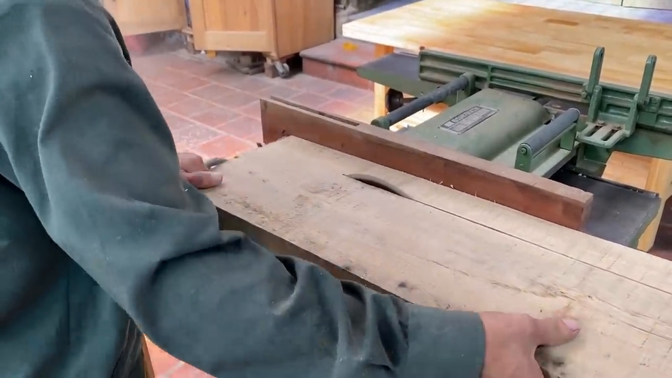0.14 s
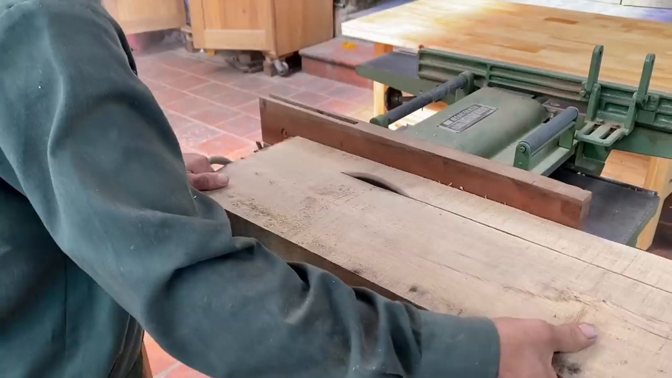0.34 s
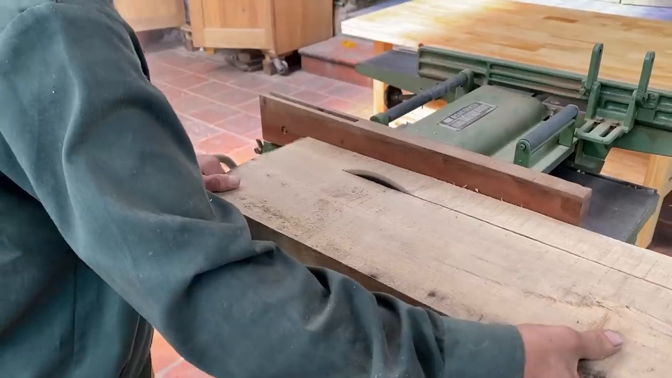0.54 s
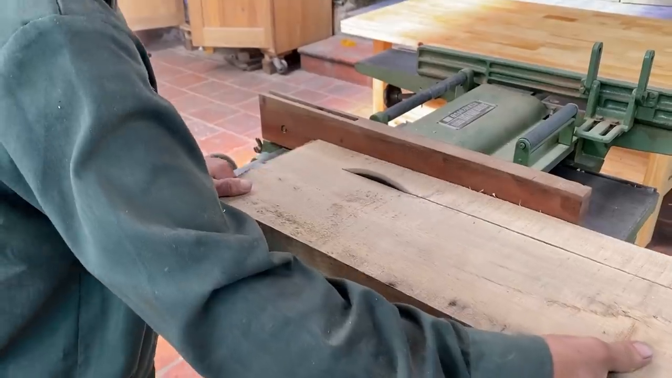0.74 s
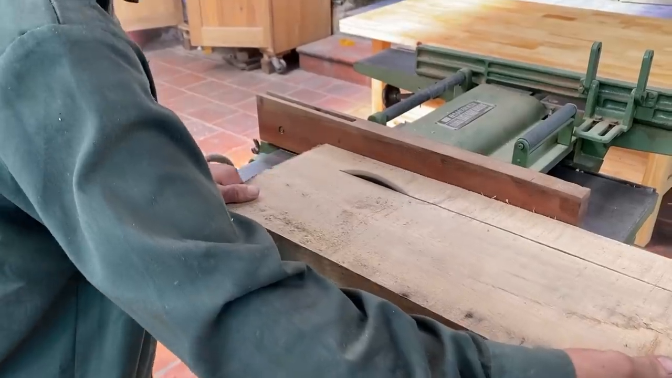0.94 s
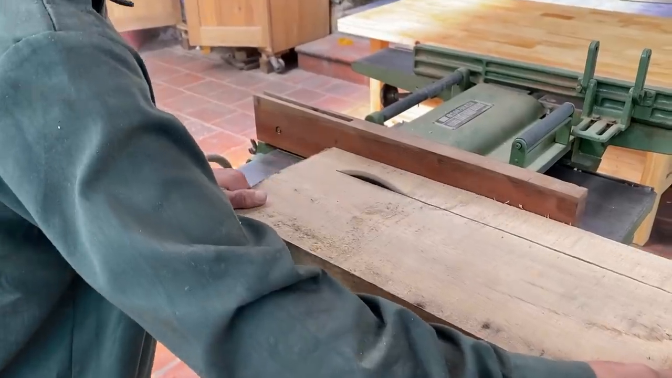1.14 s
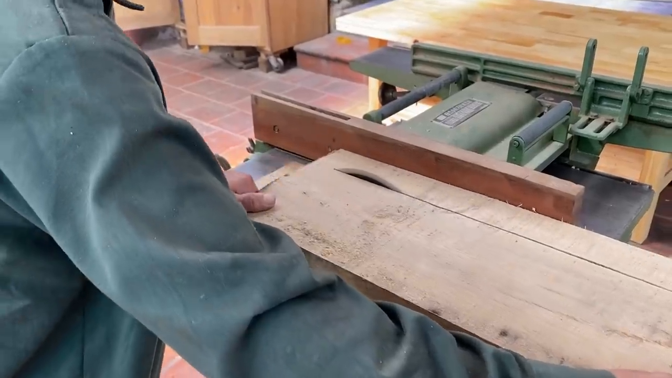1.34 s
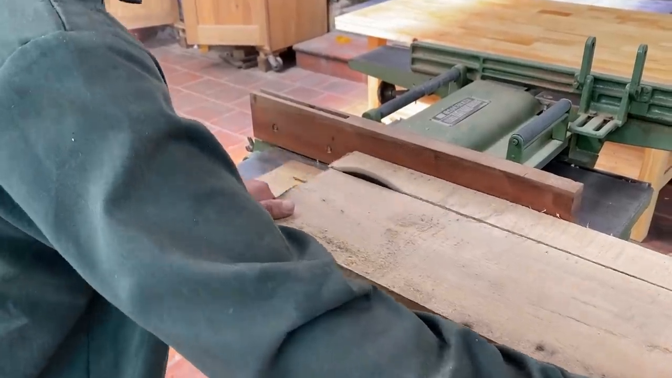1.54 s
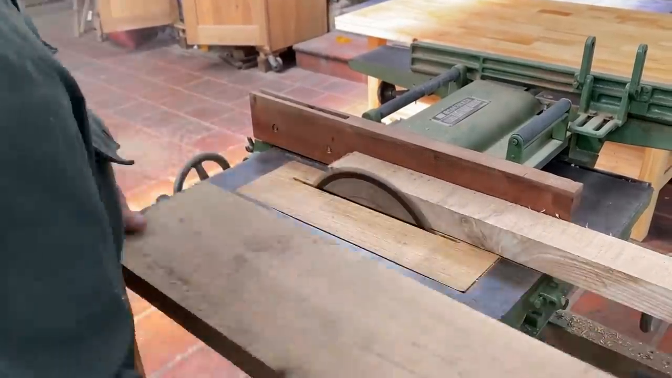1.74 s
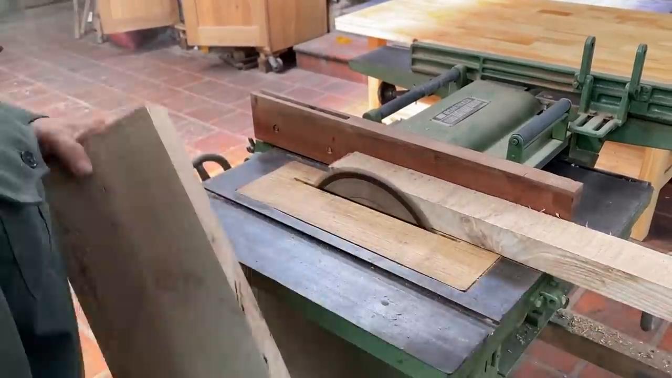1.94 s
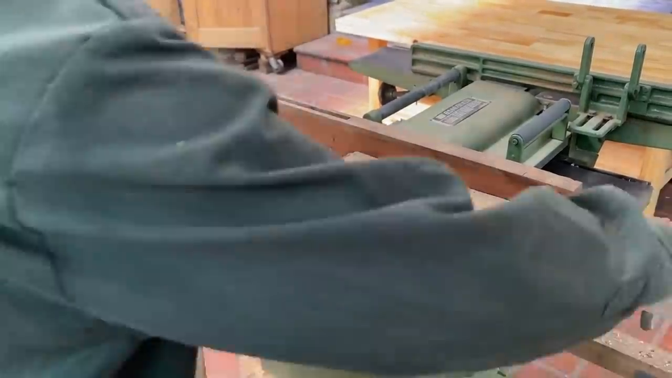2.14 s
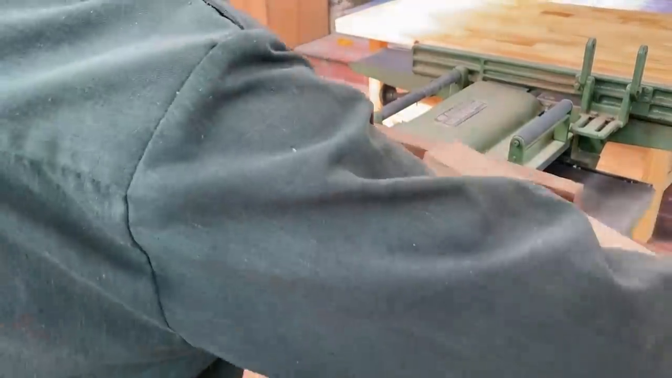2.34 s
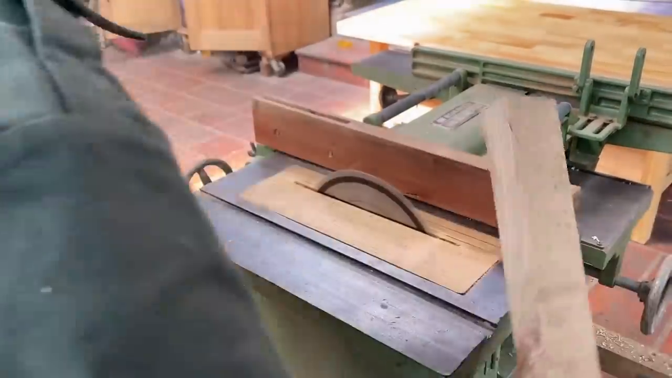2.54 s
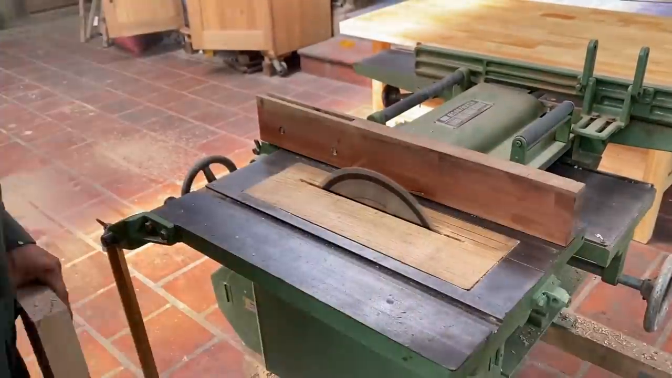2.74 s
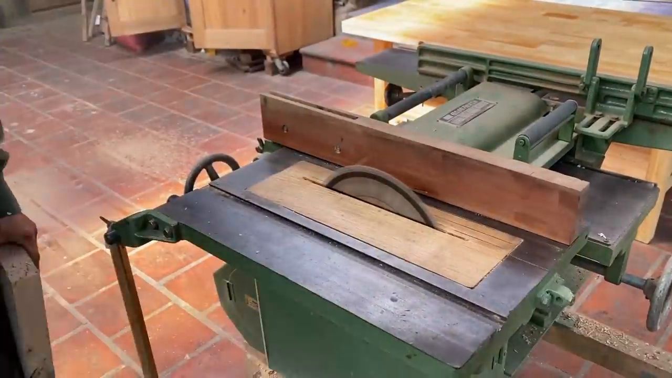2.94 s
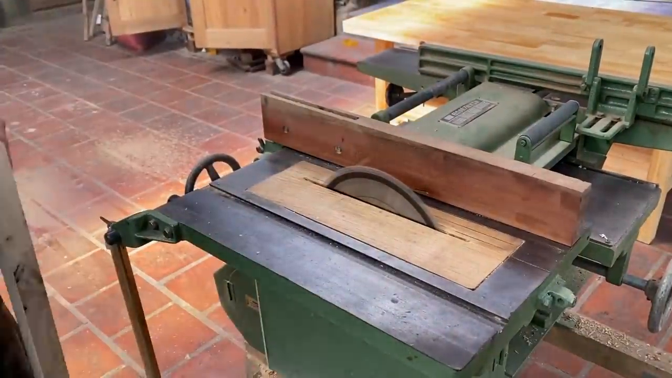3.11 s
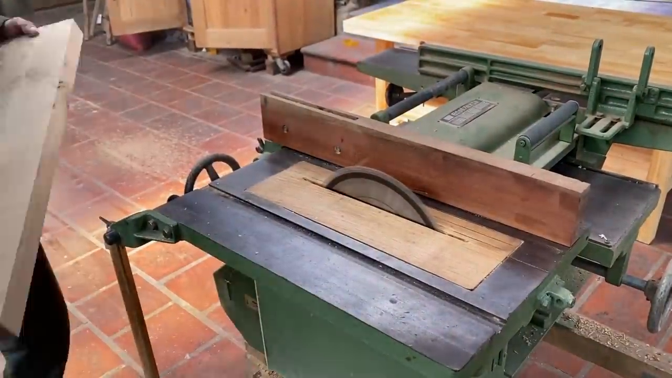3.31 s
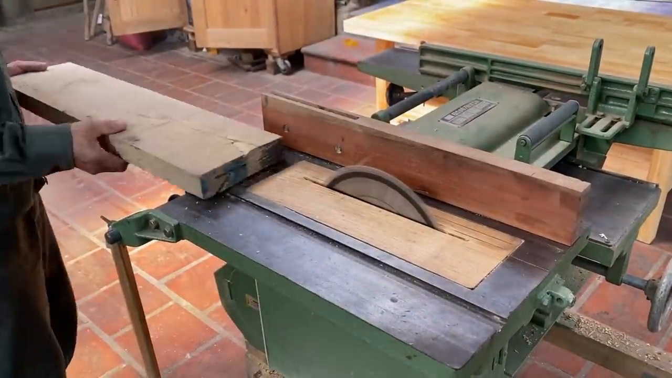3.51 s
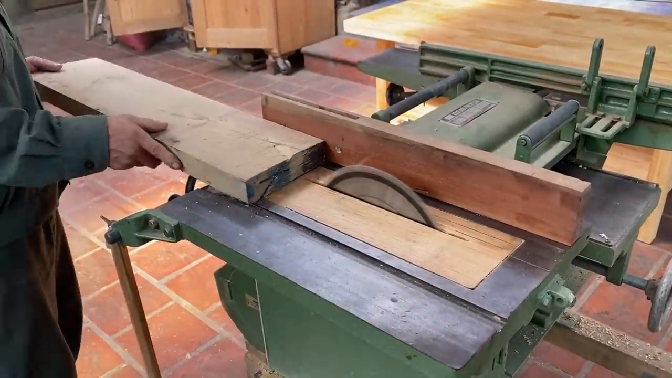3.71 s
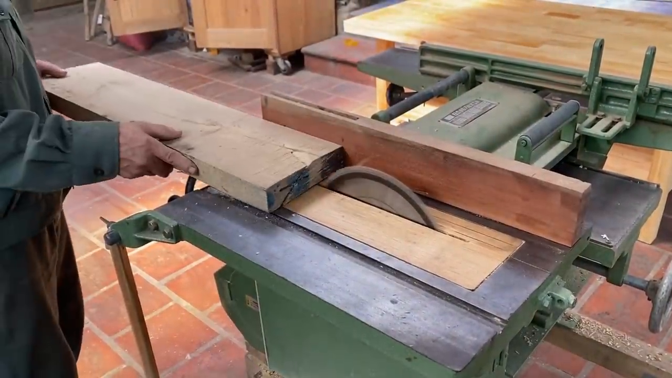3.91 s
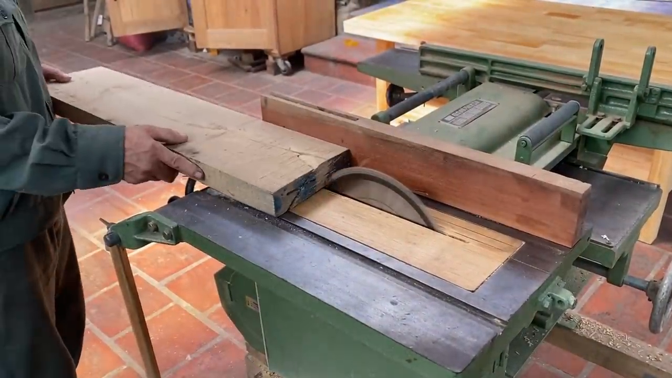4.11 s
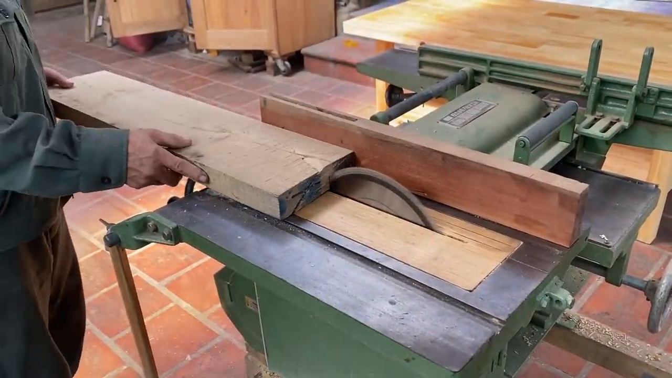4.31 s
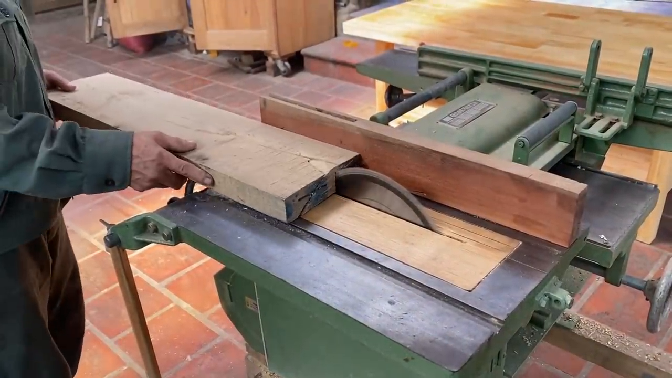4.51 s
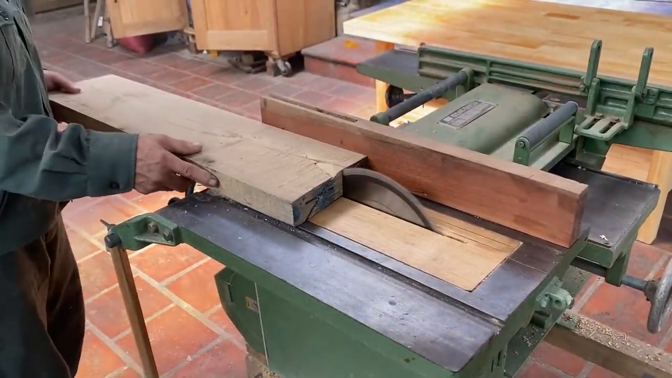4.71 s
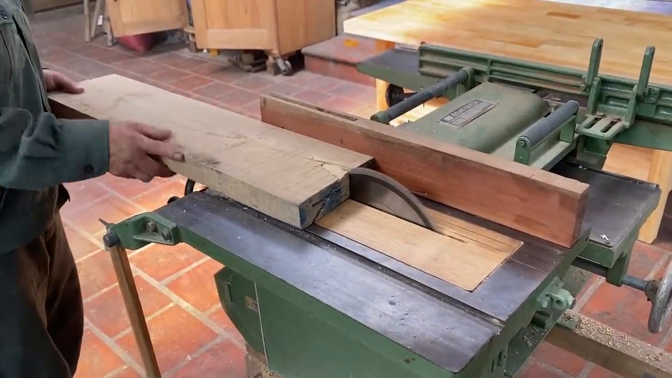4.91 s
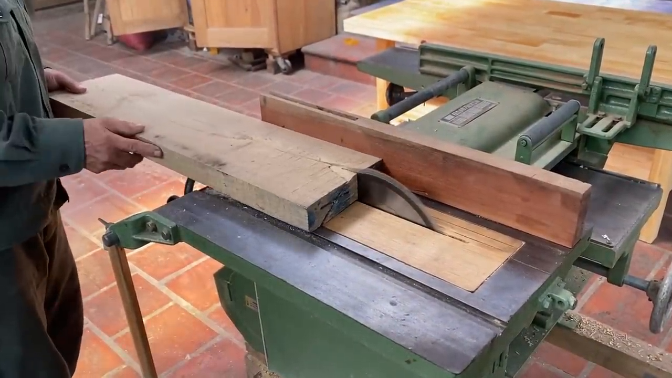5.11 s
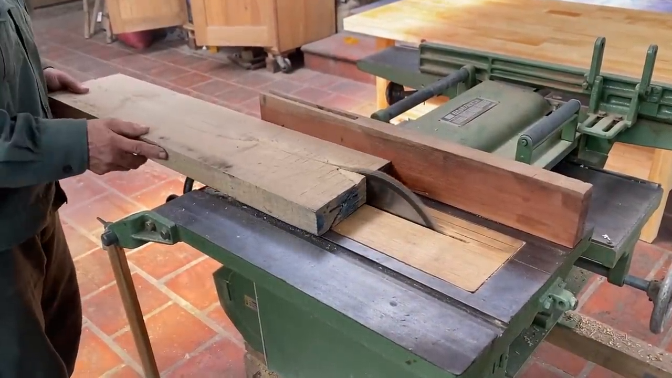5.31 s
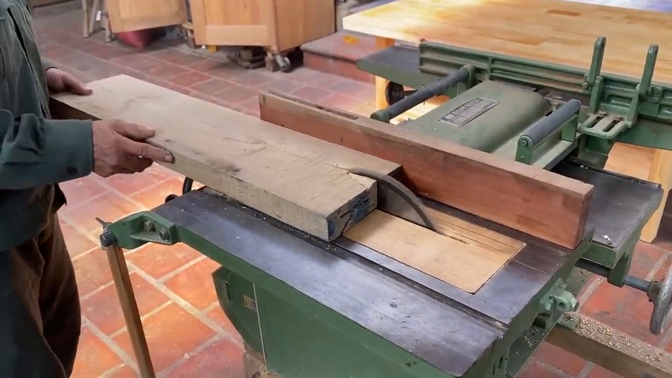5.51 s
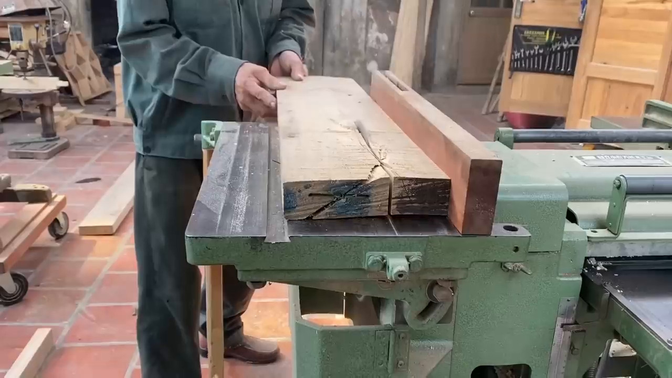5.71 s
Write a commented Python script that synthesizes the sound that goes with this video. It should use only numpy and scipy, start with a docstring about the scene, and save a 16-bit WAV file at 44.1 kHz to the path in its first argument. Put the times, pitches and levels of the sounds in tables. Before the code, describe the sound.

Close in a workshop, a whining woodworking machine saws a plank, an offcut scrapes the blade, wood clacks, and another board is fed in, squealing.

```python
"""In a workshop, close to a combination saw and planer: its cutter block whines and its motor hums throughout.
A board is ripped to its end; the offcut rubs the blade and is nicked as it is lifted, leaving the blade ringing.
Wood knocks and bounces, then a second board is fed in. Tooth pulses shake noise through the steel's resonances,
chips are shaped noise, whine and squeals are wavering tones; during a cut the whine sags and the drone is quieter."""
import sys
import numpy as np
from scipy import signal
from scipy.fft import rfft, irfft
from scipy.io import wavfile
from scipy.ndimage import minimum_filter1d

SR = 44100
rng = np.random.default_rng(int(sys.argv[2]) if len(sys.argv) > 2 else 0)


def transcribe(u):
    """Save the signal u as a 16-bit wav file named by the first command-line argument.

    u: samples, shape (n,) or (channels, n), limited to [-1, 1]; the rate is SR.
    q: integer samples, one column per channel.
    """
    v = np.clip(np.atleast_2d(u).T, -1, 1)
    q = np.round(v * 32767).astype(np.int16)
    wavfile.write(sys.argv[1], SR, q)


N = 253575
T = np.arange(N) / SR  # seconds
FREQS = np.arange(N // 2 + 1) * SR / N  # Hz


def ripping(force, blade_db=-1.1):
    """The buried blade: ringing, chips and singing all follow the bite until the board parts."""
    # how hard the teeth bite while the first board is ripped [time_s, level_db]
    rip_bite = [(0.0, -36), (0.18, -30.5), (0.3, -35.5), (0.342, -30.5), (0.448, -31), (0.472, -30),
                (0.52, -34), (0.606, -33), (0.74, -35), (0.964, -31), (1.216, -33), (1.226, -36),
                (1.436, -34), (1.446, -29.5), (1.57, -35), (1.698, -37.5), (1.715, -30.5)]
    # resonances of the blade buried in the board [pitch_hz, width_hz before damping, level_db]
    buried_blade = [(3480, 150, -7), (3740, 134, -3), (4000, 120, -1), (4380, 110, -5.5), (4700, 130, -1),
                    (4840, 110, -1), (5215, 100, .5), (5800, 100, -6), (6020, 120, -7), (6490, 190, -6),
                    (7280, 110, -11), (7850, 130, -8), (8400, 80, -5), (9550, 130, -10), (9900, 130, -6.5),
                    (10060, 100, -5), (10720, 170, -6), (11500, 200, -6.5), (12150, 170, -5),
                    (13800, 300, -11)]
    # chip spray of a buried cut [pitch_hz, density_db]
    chip_colour = [(50, -51), (300, -12), (1100, -13), (1700, -3), (2100, -4.5), (2380, 0.5), (2650, -7),
                   (2950, -3), (3500, -2), (6000, -0.5), (7200, -4), (9000, -2), (12000, 1), (15500, -2)]
    end_s, release_s, usual_db = 1.718, 0.0081, -33.5
    chips_db, chips_per_bite = -36.5, 0.77  # at the usual bite; dB per dB of bite
    splinter_db = -8  # against the chips

    level_db, = curves(rip_bite)
    bite_db = level_db - usual_db
    contact = np.exp(-np.maximum(T - end_s, 0) / release_s)
    steel = contact * undb(level_db + blade_db)
    spray = contact * undb(chips_db + chips_per_bite * bite_db)
    sawing = cut(steel, spray, force, buried_blade, chip_colour, damping=0.86, swell_db=2.3, scatter=0.62)
    snaps = spray * undb(splinter_db) * splinters()
    return sawing + snaps + contact * singing(bite_db) + strip_buzz()


def singing(bite_db):
    """Pinched in the kerf, the blade breaks into spells of a rough, wavering note; an upper mode follows the bite."""
    # spells of singing, each in one of two blade modes [start_s, end_s, first_hz, last_hz, level_db at usual bite]
    pinches = [(-.05, 0.137, 3930, 3946, -40), (0.141, 0.365, 3950, 4050, -35), (.33, .49, 4855, 4840, -39),
               (0.552, .68, 3980, 4000, -42), (.57, .72, 4835, 4830, -41),
               (0.852, 1.174, 3920, 3930, -36.5), (1.183, 1.43, 3955, 3950, -41.5),
               (1.435, 1.465, 4020, 4000, -37), (1.525, 1.585, 3975, 3950, -36.5),
               (1.691, 1.72, 4110, 4170, -35.5)]
    attack_s, release_s = 0.023, .02
    spell_per_bite, upper_per_bite = .5, 1.7  # dB per dB of bite
    upper_hz, upper_db = 4835, -46  # at the usual bite
    fade_s, fade_db_per_s = 1.15, 37  # the upper mode dies as the kerf runs out

    spells = 0
    for start, end, first_hz, last_hz, db in pinches:
        hz = np.interp(T, [start, end], [first_hz, last_hz])
        gain = undb(db + spell_per_bite * bite_db) * spell(start, end, attack_s, release_s)
        spells = spells + gain * tone(hz, wander_hz=24, flutter_db=3, rate=90)
    fade_db = fade_db_per_s * np.maximum(T - fade_s, 0)
    upper_gain = undb(upper_db + upper_per_bite * bite_db - fade_db)
    return spells + upper_gain * tone(upper_hz, wander_hz=36.0, flutter_db=4.5, rate=70)


def splinters(scatter_db=4.5, length_s=0.00042, per_s=300):
    """Fibres snap at random, each a tiny burst of noise; their strengths scatter and a few stand out."""
    # spectrum of the snaps [pitch_hz, density_db]
    snap_colour = [(300, -23), (1500, -8.5), (2900, -11), (4000, 1), (7000, -5), (12000, -2), (15500, -2)]
    snaps = (rng.random(N) < per_s / SR) * undb(scatter_db * rng.standard_normal(N))
    force = signal.lfilter([1], [1, -np.exp(-1 / (length_s * SR))], snaps)
    return excite(force, slope(snap_colour))


def strip_buzz(attack_s=0.067, release_s=0.03):
    """The loose strip being split off buzzes in short, sliding spells."""
    # buzzes of the strip [start_s, end_s, first_hz, last_hz, level_db]
    buzzes = [(-.05, .22, 1980, 1526, -53.5), (0.351, 0.53, 1684, 1597, -58),
              (0.847, 1.102, 1752, 1512, -54.5), (1.447, 1.61, 1825, 1844, -57)]
    out = 0
    for start, end, first_hz, last_hz, db in buzzes:
        hz = np.interp(T, [start, end], [first_hz, last_hz])
        gain = undb(db) * spell(start, end, attack_s, release_s)
        out = out + gain * tone(hz, wander_hz=75.7, flutter_db=3.0, rate=176)
    return out


def feeding(force, blade_db=-1.5, pan_db=0.23, start_s=4.13):
    """The second board: blade and screech follow the bite; chips and high modes peak while its end is open."""
    # how hard the teeth bite as the second board is fed in [time_s, level_db]
    feed_bite = [(4.2, -40), (4.216, -33.5), (4.456, -33.5), (4.996, -33), (5.064, -27.5), (5.088, -33.5),
                 (5.2, -29.5), (5.32, -28.5), (5.39, -29.5), (5.468, -33.5), (5.684, -34), (5.715, -39)]
    # resonances of the blade entering the board [pitch_hz, width_hz before damping, level_db]
    free_blade = [(3060, 40, -10.5), (3390, 30, -7.5), (3660, 90, -5.5), (3800, 35, -6), (4215, 45, -3.5),
                  (4400, 50, -7.5), (4650, 110, -6), (5010, 60, -5), (5420, 18, -12), (5600, 55, -9.5),
                  (5935, 35, -8), (6240, 60, -11), (6360, 50, -3), (7180, 50, -9.5), (7750, 28, -15),
                  (8380, 52, -13), (8770, 42, -13), (9395, 39, -8.5), (9770, 42, -13), (10550, 80, -20),
                  (11000, 56, -14), (11400, 90, -18), (12200, 120, -18), (12600, 70, -15), (12830, 70, -15),
                  (13080, 110, -12.5), (13600, 80, -12), (14400, 110, -17), (15350, 140, -20)]
    # chip spray of an open cut [pitch_hz, density_db]
    spray_colour = [(50, -32), (300, -16), (600, -9), (1100, -12), (1700, -6.5), (2600, -8), (3400, -4.5),
                    (6000, -6), (7400, -9), (9000, -4.5), (11000, -3.5), (13300, -1.5), (15500, -2)]
    attack_s, usual_db = 0.052, -33
    spray_db, spray_per_bite = -37, 0.068  # at the usual bite; dB per dB of bite
    entry_peak_s, entry_width_s = 4.345, 0.25
    entry_spray_db, entry_damping_db = 3.5, 1.5  # more chips, less ringing while the end is open
    shimmer_db, shimmer_hz = -33.5, 7000  # the barely buried blade rings in its modes above this pitch
    belly_db, belly_growth_db_per_s = -2, 2  # the blade's low modes swell as the cut deepens

    level_db, = curves(feed_bite)
    bite_db = level_db - usual_db
    contact = np.clip((T - start_s) / attack_s, 0, 1) ** 2
    open_end = np.exp(-abs(T - entry_peak_s) / entry_width_s)
    steel = contact * undb(level_db + blade_db - entry_damping_db * open_end)
    spray = contact * undb(spray_db + entry_spray_db * open_end + spray_per_bite * bite_db)
    sawing = cut(steel, spray, force, free_blade, spray_colour, damping=0.7, swell_db=2.0)
    lift_db = belly_db + belly_growth_db_per_s * (T - start_s)
    sawing = lift(sawing, lift_db, centre_hz=4150, width_hz=900)
    high_modes = resonances(free_blade, damping=0.39) / np.sqrt(1 + (shimmer_hz / (FREQS + 1)) ** 8)
    shimmer = undb(shimmer_db) * open_end * excite(force, high_modes)
    voices = shimmer + edge_rasp() + screech(bite_db, start_s) + board_voice()
    return (sawing + contact * voices) * undb([[pan_db], [-pan_db]])


def screech(bite_db, start_s, beat_db=-8):
    """As the cut deepens the blade builds one high note, split into two that beat; a lower one grows later."""
    high_hz, split_hz, low_hz = 5012, 20, 4610
    high_level_db, high_per_bite = -40.8, .4  # at the usual bite; dB per dB of bite
    low_level_db, low_per_bite, low_growth_db_per_s = -50, 1.5, 7.5
    young_start_db, build_s = -7, .25

    young_db = young_start_db * np.exp(-np.maximum(T - start_s, 0) / build_s)
    high_db = high_level_db + high_per_bite * bite_db + young_db
    low_db = low_level_db + low_per_bite * bite_db + low_growth_db_per_s * (T - start_s)
    note = tone(high_hz, wander_hz=9, flutter_db=3, rate=50)
    twin = undb(beat_db) * tone(high_hz - split_hz, wander_hz=16, flutter_db=3.5, rate=40)
    low = undb(low_db) * tone(low_hz, wander_hz=26.54, flutter_db=2.0, rate=104)
    return undb(high_db) * (note + twin) + low


def edge_rasp(attack_s=.012, release_s=.008):
    """The teeth tear at the board's open end in short, very bright spells."""
    # rasps, each through a squared resonance [start_s, end_s, pitch_hz, width_hz, level_db]
    rasps = [(4.175, 4.25, 6270, 300, -38.5), (4.165, 4.29, 13650, 250, -44),
             (4.28, 4.405, 13050, 900, -36.5)]
    out = 0
    for start, end, hz, width, db in rasps:
        noise = excite(1, resonances([(hz, width, 0)], damping=1) ** 2)
        out = out + undb(db) * spell(start, end, attack_s, release_s) * noise
    return out


def board_voice():
    """The board's end chatters on entry, the table shudders, then the kerf squeals."""
    return chatter() + table_shudder() + kerf_squeal()


def chatter():
    """The board's end chatters ever harder as the teeth enter, then drops to a broken, fading murmur."""
    # chatter modes of the board's end [pitch_hz, loudest_s, level_db]
    chatter_modes = [(2022, 4.395, -37.5), (2060, 4.36, -42), (2176, 4.315, -38.5), (3055, 4.39, -43)]
    rise_db_per_s, release_s = 79, 0.021
    murmur_db, fade_db_per_s = -16.5, 10
    start_s, attack_s = 4.18, 0.039

    out = 0
    for hz, peak_s, db in chatter_modes:
        before, after = np.maximum(peak_s - T, 0), np.maximum(T - peak_s, 0)
        burst = undb(-rise_db_per_s * before) * np.exp(-after / release_s)
        burst = burst * tone(hz, wander_hz=14, flutter_db=2.0, rate=61)
        murmur = (T > peak_s) * undb(murmur_db - fade_db_per_s * after)
        murmur = murmur * tone(hz, wander_hz=34.9, flutter_db=5, rate=45)
        out = out + undb(db) * (burst + murmur)
    return out * np.clip((T - start_s) / attack_s, 0, 1)


def table_shudder(attack_s=0.037, release_s=0.057):
    """The table shudders under each push: deep noise, strongest near 25 Hz."""
    # pushes [start_s, end_s, level_db]
    shudders = [(4.14, 5.02, -59.5), (5.48, 5.6, -58)]
    pushes = sum(undb(db) * spell(start, end, attack_s, release_s) for start, end, db in shudders)
    return pushes * excite(1, slope([(12, -15), (25, 10.5), (55, -13), (110, -8.0), (300, -24), (1500, -70)]))


def kerf_squeal(best_hz=1515, choke_db_per_hz=0.6):
    """A thin squeal swells in the kerf; pushed above its best pitch, it chokes."""
    # pitch of the squeal [time_s, pitch_hz]
    squeal_pitch = [(4.6, 1470), (5.05, 1477), (5.11, 1545), (5.17, 1512), (5.3, 1492), (5.58, 1459)]
    hz, = curves(squeal_pitch)
    choke_db = choke_db_per_hz * np.maximum(hz - best_hz, 0)
    gain = undb(-50 - choke_db) * spell(4.5, 5.66, attack_s=0.65, release_s=0.12)
    return gain * tone(hz, wander_hz=5.3, flutter_db=1.5, rate=30)


def rubbing(force, attack_s=0.034, release_s=0.022):
    """The parting offcut grazes the side of the blade in several touches and is nicked as it is lifted."""
    # touches [start_s, end_s, blade_db, dust_db, easing_db_per_s, low_mode_lift_db]
    touches = [(1.58, 1.703, -37, -48, 4, 8), (1.703, 1.92, -45, -48, 4, -1),
               (1.928, 2.364, -39.5, -46, 2, -1), (2.4, 2.452, -33, -39, 2, 10)]
    # resonances of the blade touched from the side [pitch_hz, width_hz before damping, level_db]
    grazed_blade = [(3220, 70, -5), (3715, 70, 2.5), (4040, 120, -3), (4230, 80, 1), (4580, 70, -4),
                    (4990, 40, 1), (5380, 85, 2.5), (5790, 50, -5), (6340, 60, -1.5), (7180, 45, -1),
                    (7800, 70, -9), (8420, 110, -1.5), (8910, 50, -5), (9350, 100, 2), (9770, 55, -1),
                    (10300, 60, -2), (10600, 130, -2.5), (11100, 130, -4), (11600, 90, -5),
                    (12110, 100, -1), (12430, 120, -5), (13600, 200, -11)]
    # dust of a grazing touch [pitch_hz, density_db]
    dust_colour = [(300, -32), (2500, -30), (3700, -10), (5400, 2), (6800, 4.5), (7600, 1), (9500, -3),
                   (12000, -2), (13500, 1), (15500, -1)]
    steel = spray = lift_db = 0
    for start, end, blade_db, dust_db, easing, low_db in touches:
        eased = undb(-easing * np.clip(T - start, 0, end - start))
        contact = spell(start, end, attack_s, release_s) * eased
        steel = steel + undb(blade_db) * contact
        spray = spray + undb(dust_db) * contact
        lift_db = lift_db + low_db * contact
    graze = cut(steel, spray, force, grazed_blade, dust_colour, damping=.9, swell_db=1.8)
    return lift(graze, lift_db, centre_hz=4100, width_hz=1000)


def tooth_force(whine_hz, uneven_db, grain_db, runout_db, bite=0.32, count=28):
    """Each tooth bites and lets go; the same high teeth return every turn, and the wood's grain varies."""
    turn_hz = whine_hz / 4.515
    teeth = np.cumsum(turn_hz) / SR * count
    tooth = teeth.astype(int)
    height = uneven_db * rng.standard_normal(count)[tooth % count]
    runout = runout_db * np.sin(2 * np.pi * teeth / count)  # once a turn
    fibres = 1.6 * rng.standard_normal(N)[tooth]
    pulse = .5 + np.exp(-(teeth % 1) / bite)
    return pulse * undb(height + runout + fibres + grain_db * walk(47))


def cut(steel, spray, force, blade, chips, damping, swell_db, scatter=0.44, room_db=-9):
    """Teeth ring the blade and throw chips, whose flight evens out the tooth pulses; bands of the hiss flicker."""
    # a few bands of the hiss flicker and rest below it [pitch_hz, width_hz, flicker_db]
    band_flicker = [(620, 200, 4), (1650, 300, 3.5), (2350, 250, 3.5), (2850, 250, 4)]
    flicker_hz, sink = 18, 0.83  # share of the flicker by which they rest below the hiss
    ringing = steel * blade_modes(force, blade, damping, swell_db)
    hiss = spray * excite(force ** scatter, slope(chips))
    for hz, width, db in band_flicker:
        hiss = lift(hiss, db * (walk(flicker_hz) - sink), hz, width)
    direct = ringing + hiss
    return direct + undb(room_db) * room(direct.mean(axis=0), t60=0.26, top_hz=6560)


def blade_modes(force, modes, damping, swell_db, count=4):
    """The teeth ring the blade; interleaved sets of its modes swell and fade as the wood's grip shifts."""
    grip_hz = 5  # rate of the shifts
    radiation = 1 / np.sqrt(1 + (2600 / (FREQS + 1)) ** 8)  # the thin disc radiates little bass
    out = 0
    for first in range(count):
        response = resonances(modes[first::count], damping) * radiation
        ringing = through(force * rng.standard_normal((2, N)), response)
        out = out + ringing * undb(swell_db * walk(grip_hz))
    return spread(*map(unit, out))


def blade_ring(level_db=-42.5, nick_s=2.45):
    """Let go by the offcut, the blade rings on in its decaying modes."""
    # modes ringing out after the nick [pitch_hz, level_db, t60_s]
    free_modes = [(2019, -15, 4), (2955, -9, .7), (3047, -10, .7), (3370, 0, 3), (3690, -8, .8),
                  (4062, -9, .5), (4196, -13, 1), (4997, -4.5, 1.4), (5819, -3.5, .8), (5923, -6, 1.4),
                  (6345, -11, .5)]
    steel = undb(level_db) * ring(free_modes, nick_s)
    return steel + undb(-14) * room(steel)


def knocks(spread_s=0.09, crack_s=0.001212, crack_db=-13.0, room_db=-8.5):
    """A bending wave, treble first, with a crack of crushed fibres; then the modes and the room ring on."""
    # knocks of wood [time_s, peak_db before the room, low_pass_hz, ring_db]
    blows = [(3.0655, -27, 2000, -48), (3.2597, -27, 7000, -40), (3.2623, -7.2, 13000, -19.5),
             (3.3236, -27.5, 13000, -37), (3.3228, -31, 2900, -32), (3.5655, -33, 4000, -34)]
    # the first bending wave of a knock [pitch_hz, density_db]
    wave_colour = [(60, -56), (170, -18), (330, -7.5), (500, -2.5), (1000, -3), (1700, -9), (2100, -4.5),
                   (3100, -11), (4200, -1.5), (4900, -6), (6100, -2), (7000, -10), (7800, 3), (8700, -11),
                   (11000, -18), (15000, -38)]
    # what the struck wood and table ring with [pitch_hz, level_db, t60_s]
    wood_modes = [(230, -25, .08), (340, -22, .06), (510, -19, .05), (700, -21, .04), (1150, -23, .04),
                  (2089, 4.5, .09), (2940, -8, .08), (3644, -11, .08), (4064, -6, .09), (5303, -9, .11),
                  (5378, -10, .1), (6060, -5, .1), (6358, -7.5, .14), (7790, 4, .015)]
    # the table's dense high modes blur into a short wash [pitch_hz, density_db]
    wash_colour = [(2500, -25), (3800, -8), (4800, -9), (5400, -1), (6300, 0), (7000, -12), (8500, -18),
                   (9500, -12), (10600, -14), (12000, -28)]
    wash_db, wash_t60_s = -1, 0.19  # level against the modes

    out = 0
    for s, db, bright_hz, ring_db in blows:
        lag = FREQS * s + 2 * spread_s * np.sqrt(FREQS)  # cycles: low bending waves travel slower
        wave = irfft(slope(wave_colour) * np.exp(-2j * np.pi * lag), N)
        crack = unit(through(rng.standard_normal(N), slope(wave_colour)))
        crack = crack * np.exp(-abs(T - s - crack_s) / crack_s)
        wash = unit(through(rng.standard_normal(N), slope(wash_colour)))
        wash = wash * (T > s) * undb(wash_db - 60 * abs(T - s) / wash_t60_s)
        ringing = undb(ring_db) * (ring(wood_modes, s + crack_s) + wash)
        blow = wave / abs(wave).max() + undb(crack_db) * crack + ringing
        blow = signal.lfilter(*signal.butter(4, min(bright_hz, SR / 3), fs=SR), blow)
        out = out + undb(db) * blow / abs(blow).max()
    return out + undb(room_db) * room(out, t60=0.12, top_hz=4500)


def machine(whine_hz, drone_db, waver=0.7, low_duck=0.66):
    """The cutter block sings and churns the air; the hum below it wavers and sinks during a cut."""
    # cutter block [multiple of the whine pitch, level_db before the drone level]
    whine_partials = [(1, -56), (2, -51.5), (3, -53), (4, -56), (5, -68), (6, -58.5), (7, -60)]
    # two partials of the whine swell and fade [time_s, second_db, third_db]
    whine_swell = [(0, -6, 2), (.22, -6, 4), (.3, 1.5, -11), (.45, -2, 0), (1.5, 0.5, 2.5), (1.75, 0, 2),
                   (2.6, -1, -.5), (3.55, 0, 3), (3.66, 1.5, -3.5), (3.95, 3, -3), (4.2, 0, -1),
                   (4.7, 2, -7)]
    # motor and frame tones [pitch_hz, wander_hz, level_db before the drone level]
    hum_tones = [(120, 1.5, -62.3), (237.7, 8.3, -62.5), (261, 2.1, -69), (376.5, 6.56, -69),
                 (506, 0.88, -73), (792, 9.05, -60), (2090, 21.7, -63)]
    # churned air [pitch_hz, density_db]
    air_colour = [(35, -53), (100, -22.5), (170, -24), (300, -19.5), (440, -14), (600, -14), (820, -5.5),
                  (1100, -14.5), (1700, -8), (2150, -9), (2600, -11), (4200, -9), (7500, -22.5),
                  (15500, -34)]
    air_db = -44.5  # before the drone level

    swell_db = dict(zip((2, 3), curves(whine_swell)))
    whine = 0
    for k, db in whine_partials:
        partial = tone(k * whine_hz, wander_hz=0.22 * k, flutter_db=1.46, rate=9)
        whine = whine + undb(db + swell_db.get(k, 0)) * partial
    hum = sum(undb(db) * tone(hz, wander_hz=wander, flutter_db=2.5, rate=16) for hz, wander, db in hum_tones)
    sag_db = np.minimum(drone_db - 2.0, 0)
    hum = hum * undb(sag_db * np.maximum(low_duck + waver * walk(16), 0))
    knives = 1 + 0.12 * np.sin(2 * np.pi * np.cumsum(whine_hz) / SR)  # each knife pushes a puff of air
    air = excite(knives * undb(0.66 * walk(25)), slope(air_colour))
    return undb(drone_db) * (whine + hum + undb(air_db) * air)


def whine_and_drone(idle_hz=465, idle_db=1.2, slow_s=.36, recover_s=.04):
    """During a cut the whine sags in pitch and the drone is turned down; both come back after it."""
    # whine and drone during the cuts [start_s, end_s, pitch_sag_hz, drone_dip_db, dip_end_s]
    cut_times = [(-1, 1.54, 10, 5.4, 1.88), (4.27, 6, 5.5, 8.5, 6)]
    hz, db = idle_hz, idle_db
    for start, end, sag, dip, dip_end in cut_times:
        hz = hz - sag * spell(start, end, slow_s, recover_s)
        db = db - dip * spell(start, dip_end, slow_s, recover_s)
    return hz, db


def room(x, t60=0.21, top_hz=6000):
    """The workshop's diffuse tail: decaying noise, unrelated left and right."""
    t = T[:SR // 2]
    tail = rng.standard_normal((2, len(t))) * undb(-60 * t / t60) * (t > .003)
    tail = signal.lfilter(*signal.butter(1, min(top_hz, SR / 3), fs=SR), tail)
    return signal.fftconvolve(x[None], tail / np.sqrt(np.sum(tail[0] ** 2)), axes=1)[:, :N]


def excite(force, response):
    """Fine random impacts under a force curve, sounding through a response; stereo, mid rms 1."""
    mid, side = through(force * rng.standard_normal((2, N)), response)
    return spread(unit(mid), unit(side))


def tone(hz, wander_hz, flutter_db, rate=20):
    """A line whose pitch wanders and whose level flutters, a little differently on each side."""
    phase = 2 * np.pi * np.cumsum(hz + wander_hz * walk(rate)) / SR
    gain = np.sqrt(2) * undb(flutter_db * walk(rate))
    return gain * (np.sin(phase) + 0.23 * walk(5) * np.cos(phase) * np.array([[1], [-1]]))


def ring(modes, start):
    """Decaying (Hz, dB, t60) modes set off at one moment, each with a random sign."""
    t = np.maximum(T - start, 0)
    out = 0
    for hz, db, t60 in modes:
        out = out + undb(db - 60 * t / t60) * np.sin(2 * np.pi * hz * t) * rng.choice([-1, 1])
    return out


def resonances(modes, damping):
    """Response of (Hz, width, dB) resonances: powers add, phases follow their sum; damping scales the widths."""
    each = []
    for hz, width, db in modes:
        detuning = (FREQS ** 2 - hz ** 2) / (damping * width * FREQS + 1)
        each.append(undb(db) / (1 + 1j * detuning))
    return np.sqrt(sum(abs(h) ** 2 for h in each)) * np.exp(1j * np.angle(sum(each)))


def lift(x, lift_db, centre_hz, width_hz):
    """Raise or lower one bell-shaped band over time."""
    band = through(x, np.exp(-((FREQS - centre_hz) / width_hz) ** 2))
    return x + band * (undb(lift_db) - 1)


def spread(mid, side):
    """Left and right from the direct sound and its scattered share."""
    # stereo width at the microphone [pitch_hz, side_minus_mid_db]
    side_colour = [(100, -1.5), (500, -10), (1000, -7.5), (2500, -8), (4500, -8.5), (8000, -3), (13000, -4)]
    side = through(side, slope(side_colour))
    return np.array([mid + side, mid - side])


def spell(start, end, attack_s, release_s):
    """Gain that rises, holds until the end, then dies away."""
    return np.clip((T - start) / attack_s, 0, 1) * np.exp(-np.maximum(T - end, 0) / release_s)


def walk(rate):
    """Smooth chance with spread 1, changing about rate times a second."""
    real, imag = rng.standard_normal((2, np.count_nonzero(FREQS < .75 * rate)))
    return unit(irfft(real + 1j * imag, N))


def curves(rows):
    """The columns of a table, joined by straight lines in time."""
    s, *columns = np.transpose(rows)
    return [np.interp(T, s, c) for c in columns]


def slope(points):
    """Gain at every frequency from (Hz, dB) points."""
    hz, db = np.transpose(points)
    return undb(np.interp(np.log(FREQS + 1), np.log(hz), db))


def through(x, response):
    """Filter by a frequency response."""
    return irfft(rfft(x) * response, N)


def unit(x):
    """Scale to rms 1."""
    return x / np.sqrt(np.mean(x ** 2))


def undb(db):
    """Decibels to gain."""
    return 10 ** (np.asarray(db) / 20)


def scene():
    """Three spells of wood on the blade, the ringing and knocks between them, and the drone behind."""
    whine_hz, drone_db = whine_and_drone()
    deep = tooth_force(whine_hz, uneven_db=1.0, grain_db=1.1, runout_db=1.0)
    light = tooth_force(whine_hz, uneven_db=1.0, grain_db=0.6, runout_db=1.0)
    shallow = tooth_force(whine_hz, uneven_db=3.5, grain_db=1.06, runout_db=.5)
    wood = ripping(deep) + feeding(shallow) + rubbing(light)
    mix = wood + blade_ring() + knocks() + machine(whine_hz, drone_db)
    dip_s, dip_width_s, dip_db = 5.731, 0.0072, -20.5  # the level dips briefly
    return mix * undb(dip_db * np.exp(-((T - dip_s) / dip_width_s) ** 2))


def record(dry, ceiling_db=-11.0, top_hz=15850):
    """The microphone sheds the deep bass; gain control ducks briefly after a loud peak; the top is cut."""
    thin = signal.sosfilt(signal.butter(2, 70, "high", fs=SR, output="sos"), dry)
    wanted = np.minimum(1, undb(ceiling_db) / (abs(thin).max(axis=0) + 1e-9)) ** 0.72
    held = minimum_filter1d(wanted, size=2500, origin=1249)  # samples; looks back only
    gain = 1 - signal.lfilter(*signal.butter(1, 70, fs=SR), 1 - held)  # too slow to catch the crack itself
    return signal.sosfilt(signal.ellip(10, .2, 80, top_hz, fs=SR, output="sos"), thin * gain)


dry = scene()
out = record(dry)
transcribe(out)
```